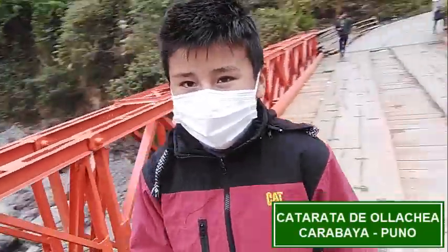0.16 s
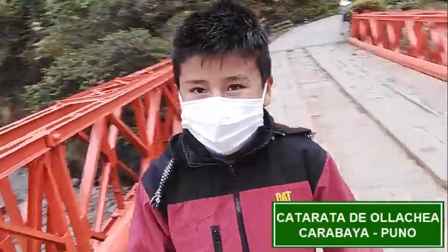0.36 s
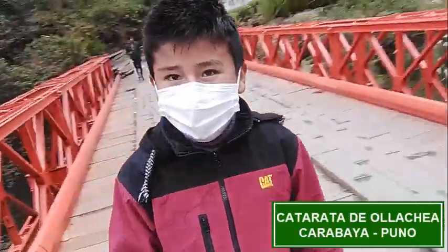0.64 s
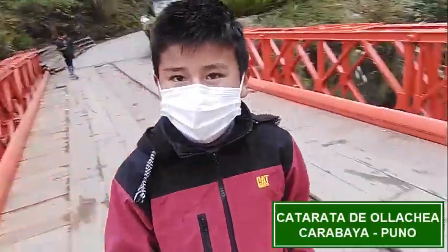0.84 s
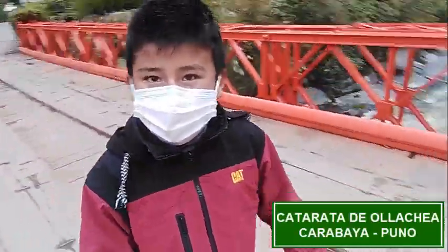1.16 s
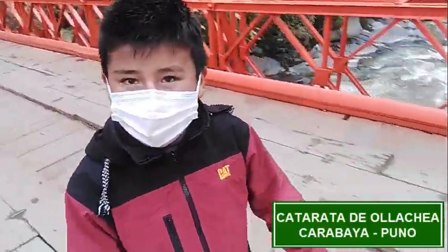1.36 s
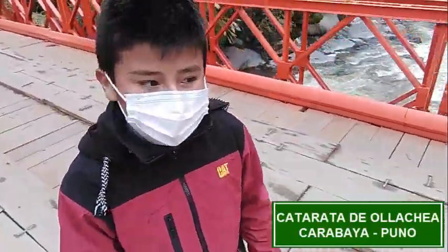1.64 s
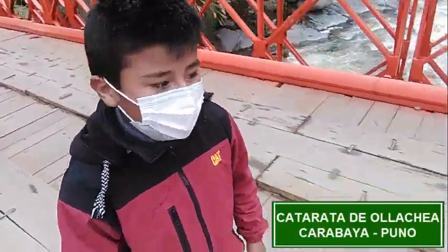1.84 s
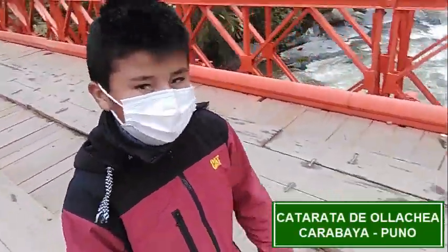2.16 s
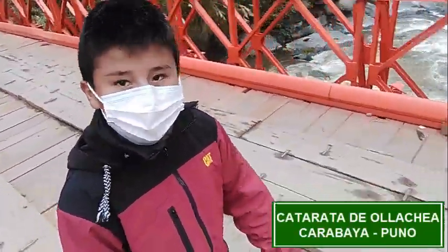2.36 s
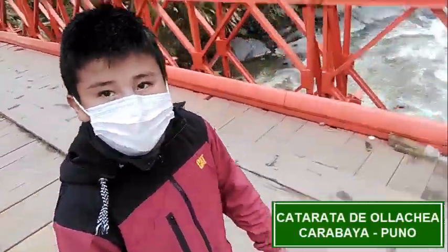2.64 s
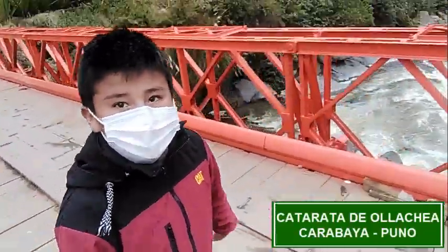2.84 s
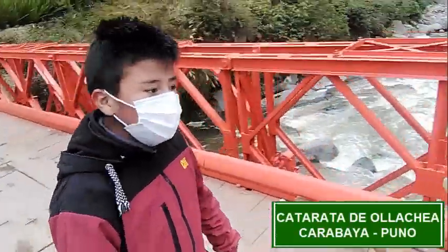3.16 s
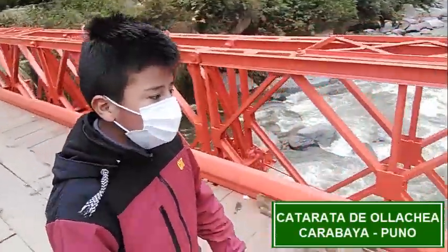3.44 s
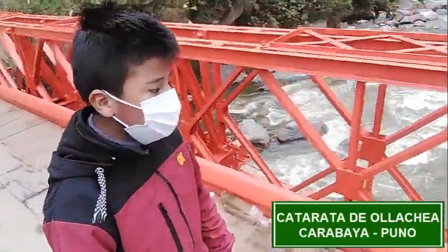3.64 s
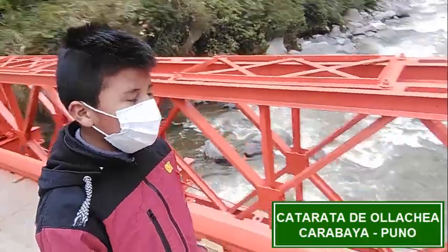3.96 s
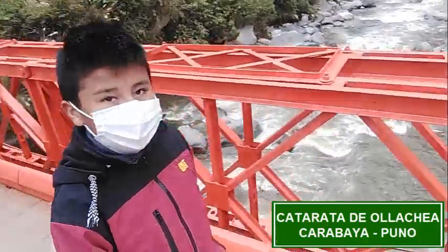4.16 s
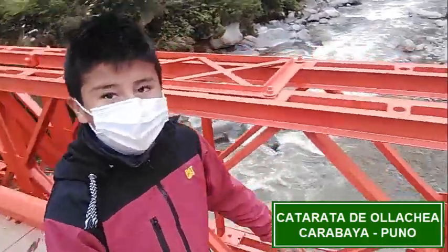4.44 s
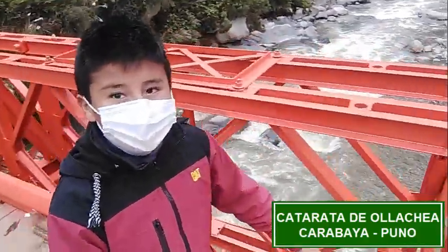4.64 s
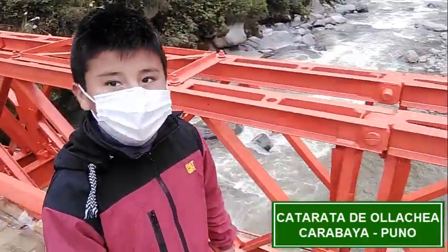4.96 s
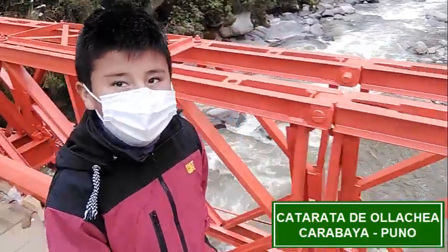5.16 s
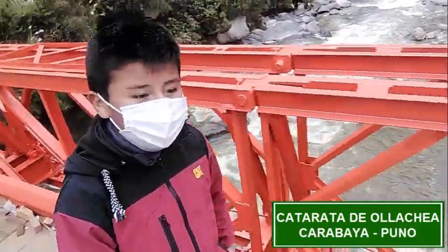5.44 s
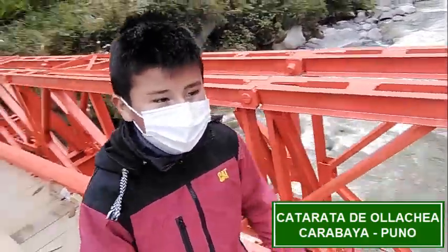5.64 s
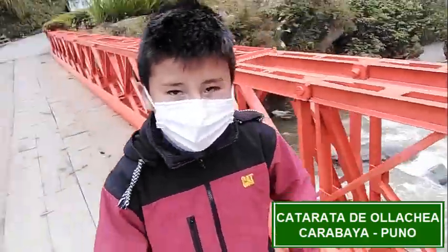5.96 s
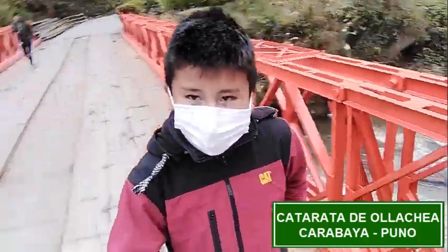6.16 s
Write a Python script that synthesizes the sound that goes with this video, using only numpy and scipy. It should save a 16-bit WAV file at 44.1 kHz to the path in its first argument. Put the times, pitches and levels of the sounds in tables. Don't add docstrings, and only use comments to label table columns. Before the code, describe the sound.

For a little over six seconds a mountain river roars without pause over boulders below a plank bridge. The sound is broad noise, heavy in the low mids, with softer diffuse spray hiss on top, its stereo image shifting slowly as the hand-held microphone turns. A brief wind thump hits the left at 0.1 s and a weaker one the right near 0.4 s. At 1.0 s a firm, short, hollow footfall knocks the boards. Wind stays light until about 2.3 s; a strong gust pushes the right at 2.5 s, then lumpy low buffeting covers both sides, with left peaks near 3.5, 4.1 and 4.3 s and another right one at 4.6 s. It eases around 5 s. At 5.7 s a soft step knocks and scuffs longer amid mild gusts. The river continues to the end, treble limited and slightly grainy with compression.

```python
import sys
import numpy as np
from scipy import signal
from scipy.fft import rfft, irfft
from scipy.io import wavfile
from scipy.ndimage import uniform_filter1d, map_coordinates

SR = 44100
rng = np.random.default_rng(int(sys.argv[2]) if len(sys.argv) > 2 else 0)


def boost(x):
    u = np.asarray(x, float) / 20
    return 10 ** u


def store_pcm(level_fs):
    pcm = np.round(np.clip(level_fs, -1, 1) * 32767).astype(np.int16)
    wavfile.write(sys.argv[1], SR, np.atleast_2d(pcm).T)


N = 277389

# time_s, axis_to_river_deg, upstream_share [0-1], hidden_share [0-1] (by girders, bodies)
TURN = [(0, 15, 0.7, 0.23), (.35, 13.3, 0.9, .05), (.7, 14.4, .8, .05), (1.0, 30, .9, 0.01),
        (1.27, 40, .95, .01), (1.45, 52.6, .88, .2), (1.7, 45, .8, .08), (2.0, 45.5, .72, .1),
        (2.6, 49.6, .62, .08), (3.0, 49.3, .55, 0.01), (3.3, 51, .58, .16), (3.7, 48, .58, .16),
        (4.0, 45.5, .55, .1), (4.4, 56, .5, .25), (5.0, 54.5, 0.6, .15), (5.5, 50, .54, .08),
        (5.75, 42, .54, .2), (6.0, 23.7, .55, 0.17), (6.29, 15, 0.6, 0.28)]
# time_s, roar_db, holder_shade [0-1]
FLOW = [(0, -22, 0.3), (.5, -23, 0.5), (1.0, -21.5, 0.6), (1.35, -21.5, 0.62), (1.7, -21.5, 0.72),
        (2.2, -21, 0.7), (2.7, -22.5, 0.3), (3.3, -23, 0.1), (3.7, -22.5, 0.3), (4.1, -23, 0.28),
        (4.5, -22, 0.52), (4.85, -22.5, 0.5), (5.2, -22, 0.6), (5.7, -23, 0.55), (6.0, -23, 0.5),
        (6.29, -22, 0.4)]
# freq_hz, level_db (per Hz)
WATER = [(45, -14.5), (185, 0.23), (800, -6.5), (940, -11), (2000, -13), (3800, -21), (7000, -20.8),
         (11000, -30)]
# freq_hz, share [0-1]
SCATTER = [(60, 0.2), (400, 0.28), (900, 0.2), (1600, 0.2), (2500, 0.6), (3400, 0.92), (4600, 0.82),
           (7000, 0.76)]
# centre_hz, width_hz
EDDIES = [(126.7, 400), (99.7, 73)]
# peak_s, length_s, level_db
GUSTS = [
    [(.08, 0.15, -17), (1.3, 0.089, -35), (2.3, 0.27, -26), (2.55, 0.93, -23.5), (2.8, 0.075, -29),
     (3.1, 0.099, -20.5), (3.35, 0.17, -20), (3.52, 0.21, -13), (3.72, 0.29, -19.5), (3.92, 0.25, -20.5),
     (4.1, 0.17, -14), (4.3, 0.27, -12.5), (4.45, 0.2, -19), (4.6, 0.11, -23), (5.7, 0.56, -26.5),
     (5.9, 0.22, -23.5), (6.15, 0.28, -24.5)],
    [(.38, 0.15, -22.5), (1.3, 0.11, -44.5), (2.5, 0.33, -14.5), (2.8, 0.95, -19.5), (3.07, 0.28, -20),
     (3.23, 0.33, -20), (3.42, 0.42, -17), (3.73, 0.27, -17.5), (3.95, 0.9, -20), (4.3, 0.33, -30.5),
     (4.57, 0.28, -16), (4.85, 0.22, -21.5), (5.05, 0.2, -24.5), (5.68, 0.13, -21.5), (6.12, .3, -26)],
]
# start_s, knock_db, plank_hz, scuff_db, scuff_t60_s
STEPS = [
    (1.0013, -4, 318, -33, 0.042),
    (5.737, -16, 319, -19.5, 0.28),
]
# centre_hz, width_hz, gain_db
PORTS = [(8607, 1310, 15), (7775, 1810, 10)]
# freq_hz, step_db
MEMORY = [(100, -5), (1200, -7), (2000, -8.5), (3500, -11.5), (6000, -12), (8000, -15), (9000, -19),
          (10500, -18)]
# freq_hz, step_db
COPY = [(30, -42), (100, -30), (700, -26.5), (1250, -22.5), (4000, -21.3), (7600, -26.3), (8700, -31),
        (10500, -28)]

PORT_GAP_M, SOUND_M_S = 0.166, 343
REACH_DEG = 21.5
SHADE_DB = -7.5
BREEZE_DB = -33


def rms_one(x):
    return x / np.sqrt(np.mean(x ** 2) + 1e-20)


def in_time(rows):
    time_s, *columns = np.transpose(rows)
    return [np.interp(np.arange(N) / SR, time_s, c) for c in columns]


def at_hz(points, hz):
    freq_hz, value = np.array(points).T
    return np.interp(np.log(hz), np.log(freq_hz), value)


def drift(rate_hz):
    r = np.exp(-80 * np.pi * rate_hz / SR)
    noise = rng.standard_normal(N // 40 + 2002)
    slow = signal.lfilter([1], [1, -2 * r, r * r], noise)[2000:]
    return np.interp(np.arange(N) / 40, np.arange(len(slow)), rms_one(slow - slow.mean()))


def resonate(x, hz, width_hz):
    r = np.exp(-np.pi * width_hz / SR)
    zeros = np.array([1, 0, -1]) * (1 - r * r) / 2
    poles = [1, -2 * r * np.cos(2 * np.pi * hz / SR), r * r]
    return signal.lfilter(zeros, poles, x)


def arrivals(count=4):
    angle_deg, upstream, _ = in_time(TURN)
    upstream = np.clip(upstream, 0, 1)
    out = np.zeros((2, N))
    for side, share in ((0.93, upstream), (-1.023, 1 - upstream)):
        for offset_deg in np.linspace(-REACH_DEG, REACH_DEG, count):
            bearing = np.radians(angle_deg + offset_deg)
            lag = side * PORT_GAP_M / SOUND_M_S * SR * np.cos(bearing)
            rapid = rng.standard_normal(N)
            late = map_coordinates(rapid, [np.arange(N) - lag], order=3, mode="wrap")
            out += np.sqrt(share / count) * np.array([rapid, late])
    return out


def scattered(hz):
    alike = np.sinc(2 * hz * PORT_GAP_M / SOUND_M_S)
    mid, side = rfft(rng.standard_normal((2, N)))
    return np.sqrt((1 + alike) / 2) * mid + np.sqrt((1 - alike) / 2) * side * [[1], [-1]]


def river(surge_db=0.02, patchy_db=0.3, spray_from_hz=2500):
    roar_db, shade = in_time(FLOW)
    hz = np.maximum(np.fft.rfftfreq(N, 1 / SR), 1)
    loose = np.clip(at_hz(SCATTER, hz), 0, 1)
    hidden = np.clip(in_time(TURN)[2], 0, 1)
    direct, around = arrivals(), scattered(hz)
    echoes = irfft(around, N)[:, ::-1]
    direct = np.sqrt(1 - hidden) * direct + np.sqrt(hidden) * echoes
    field = np.sqrt(1 - loose) * rfft(direct) + np.sqrt(loose) * around
    field = field * boost(at_hz(WATER, hz))

    place = np.clip(2 * np.log2(hz / 40), 0, 17)
    tilt_db = SHADE_DB * shade
    tilt_db = tilt_db - tilt_db.mean()
    out, surge = 0, drift(6.2)
    for k in range(18):
        band = irfft(field * np.clip(1 - abs(place - k), 0, 1), N)
        band_hz = 40 * 2 ** (k / 2)
        spray = 1 / (1 + (spray_from_hz / band_hz) ** 2)
        out = out + band * boost(spray * tilt_db + surge_db * surge + patchy_db * drift(11.0))
    return rms_one(out) * boost(roar_db + 5.5)


def gust_level(rows):
    t = np.arange(N) / SR
    humps = [boost(db) * np.cos(np.pi * np.clip((t - peak_s) / length_s, -.5, .5))
             for peak_s, length_s, db in rows]
    return 10 * np.log10(boost(BREEZE_DB) ** 2 + np.sum(np.square(humps), axis=0))


def wind(lumpy_db=2.5, brighten=0.26):
    out = []
    for rows, (hz, width_hz) in zip(GUSTS, EDDIES):
        gust_db = gust_level(rows)
        air = rng.standard_normal((2, N)) * boost(lumpy_db * drift(22.0))
        lowpass = signal.butter(2, 1.7 * hz, fs=SR, output="sos")
        rumble = rms_one(signal.sosfilt(lowpass, resonate(air[0], hz, width_hz)))
        flutter = resonate(air[1], 1.9 * hz, 0.77 * width_hz)
        flutter = rms_one(resonate(flutter, 3.06 * hz, 0.86 * width_hz))
        flutter_db = -13.5 + brighten * (gust_db + 34.0)
        out.append(boost(gust_db) * (rumble + boost(flutter_db) * flutter))
    return np.array(out)


def footfalls():
    out, t = np.zeros(N), np.arange(int(.25 * SR)) / SR
    for start_s, knock_db, plank_hz, scuff_db, scuff_t60_s in STEPS:
        knock = -boost(knock_db - 60 * t / 0.033) * np.sin(2 * np.pi * plank_hz * t)
        grit = rms_one(resonate(rng.standard_normal(len(t)), 940, 590))
        scuff = boost(scuff_db - 60 * t / scuff_t60_s) * grit
        out[round(start_s * SR):][:len(t)] += knock + scuff
    return out


def starve(x, steps, offset, window, wander_db, frame_db, follows, size):
    k, lead = np.arange(504), 2048 - offset
    waves = np.cos(np.pi / 1024 * np.outer(k + .5, np.arange(2048) + 512.5)) * window / np.sqrt(512)
    padding = [(0, 0), (lead, 2048 - (N + lead) % 1024)]
    pair = np.pad([x[0] + x[1], x[0] - x[1]], padding) / 2
    blocks = pair.reshape(2, -1, 1024)
    threads = np.concatenate([blocks[:, :-1], blocks[:, 1:]], axis=2) @ waves.T

    band = np.interp(k, [0, 40, 96, 144, 196, 320, 504], [0, 10, 17, 21, 24, 29, 35]).astype(int)
    chance = rng.standard_normal((2, threads.shape[1], 37))
    chance = np.sqrt(size) * uniform_filter1d(chance, size=size, axis=1)
    power = np.mean(np.sqrt(k) * threads ** 2, axis=(0, 2))
    loud_db = 10 * np.log10(uniform_filter1d(power, size=3))
    frame = frame_db * chance[0, :, -1] + follows * (loud_db - loud_db.mean())
    wander = wander_db * (.85 * chance[:1] + .5 * chance)[:, :, band]
    step = boost(at_hz(steps, (k + .5) * SR / 2048) + wander + frame[:, None])

    whole = np.floor((abs(threads) / step) ** .75 + .4054)
    rounded = np.sign(threads) * step * whole ** (4 / 3)
    halves = (rounded @ waves).reshape(2, -1, 2, 1024)
    joined = (halves[:, :-1, 1] + halves[:, 1:, 0]).reshape(2, -1)
    mid, side = joined[:, lead - 1024:][:, :N]
    return np.array([mid + side, mid - side])


def scene():
    return river() + wind() + footfalls()


def low_pass(x):
    return signal.sosfilt(signal.butter(12, 10960, fs=SR, output="sos"), x)


def record(dry):
    lifted = np.array([x + (boost(gain_db) - 1) * resonate(x, hz, width_hz)
                       for x, (hz, width_hz, gain_db) in zip(dry, PORTS)])
    cut = signal.sosfilt(signal.butter(4, 56, "high", fs=SR, output="sos"), lifted)
    rounded = 1.6 * np.tanh(cut / 1.7)
    sine = signal.windows.cosine(2048)
    steep = signal.windows.kaiser_bessel_derived(2048, 4 * np.pi)
    stored = starve(rounded, MEMORY, 839, sine, wander_db=1.7, frame_db=.6, follows=.6, size=4)
    copied = starve(stored, COPY, 263, steep, wander_db=3.1, frame_db=1.0, follows=.9, size=1)
    return low_pass(copied)


dry = scene()
out = record(dry)
store_pcm(out)
```